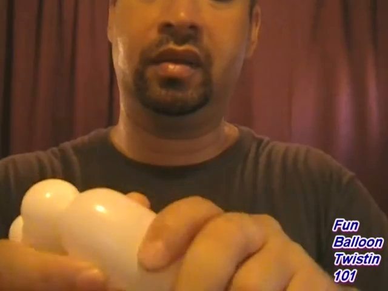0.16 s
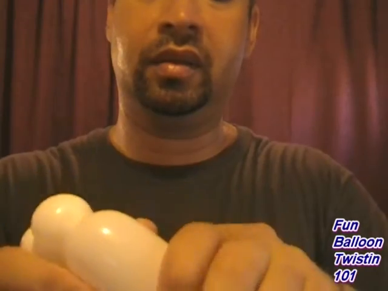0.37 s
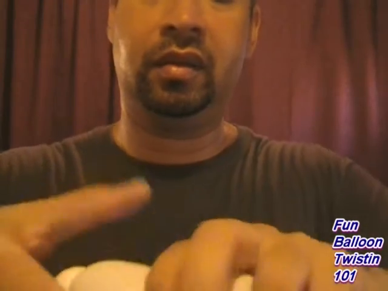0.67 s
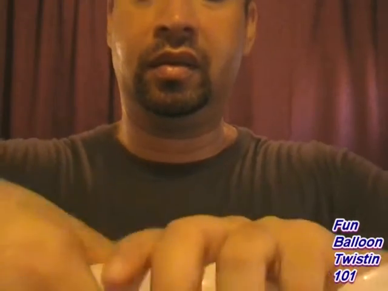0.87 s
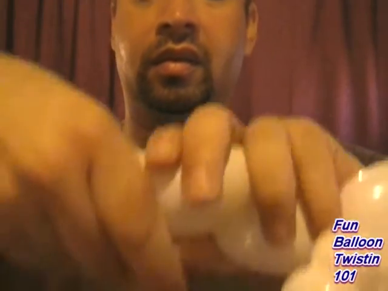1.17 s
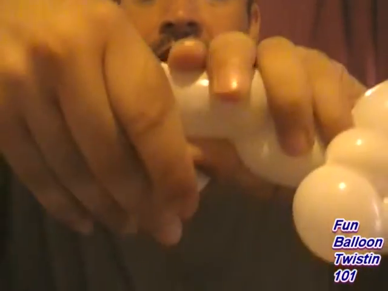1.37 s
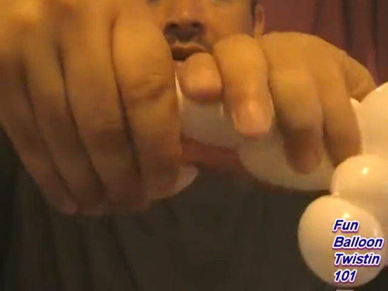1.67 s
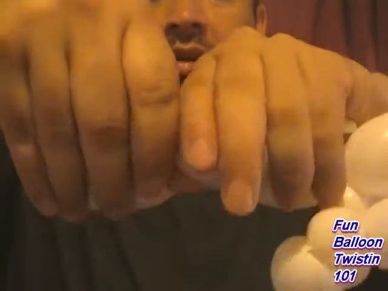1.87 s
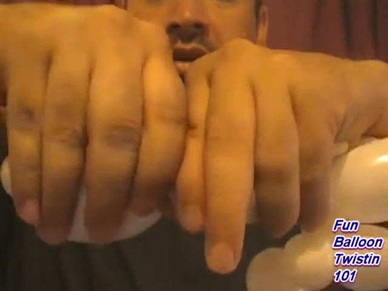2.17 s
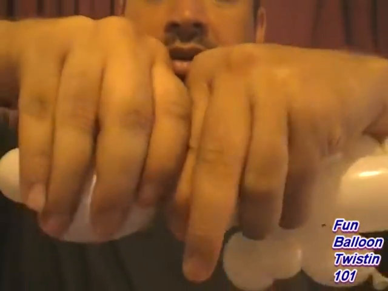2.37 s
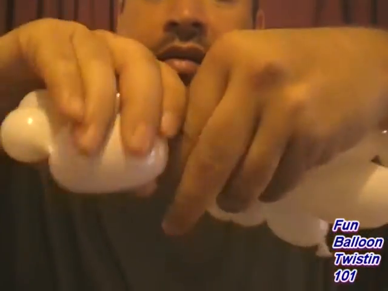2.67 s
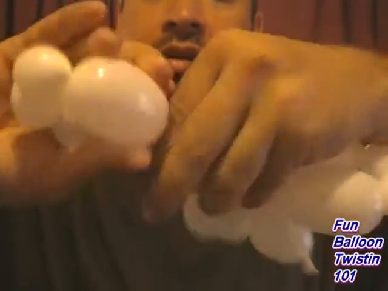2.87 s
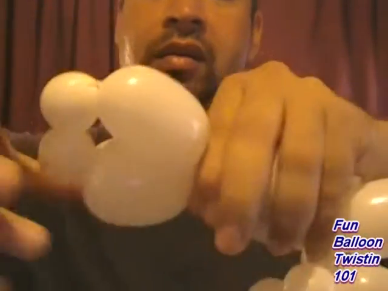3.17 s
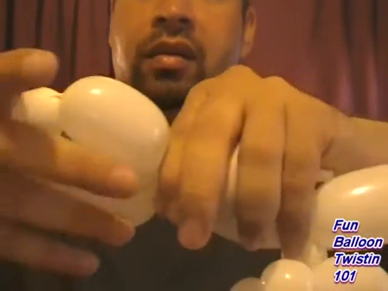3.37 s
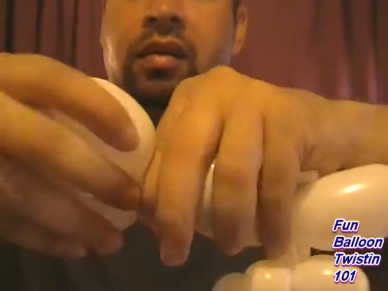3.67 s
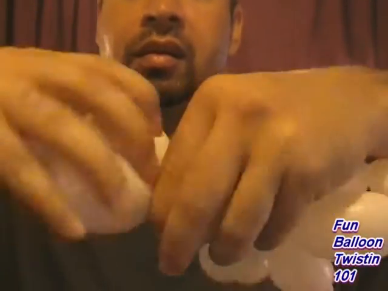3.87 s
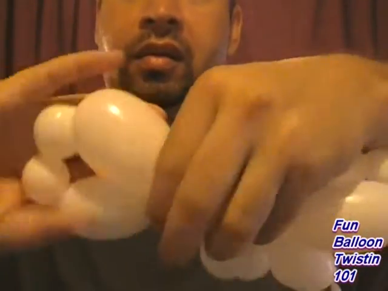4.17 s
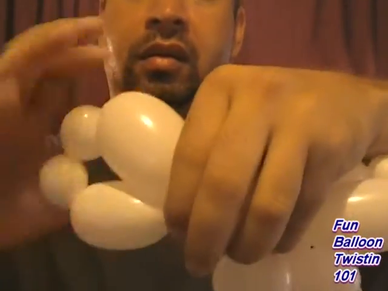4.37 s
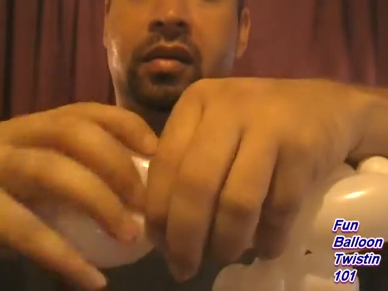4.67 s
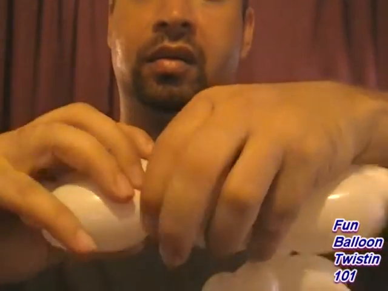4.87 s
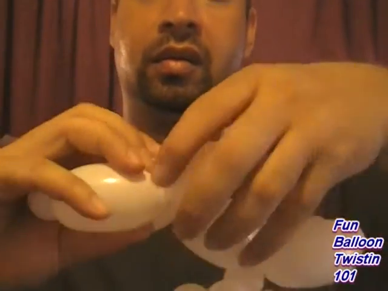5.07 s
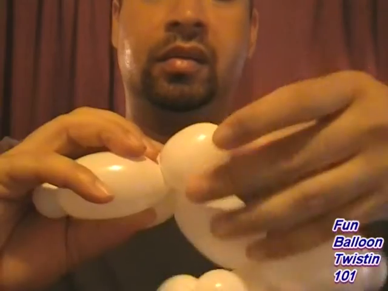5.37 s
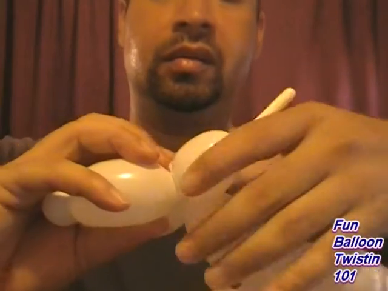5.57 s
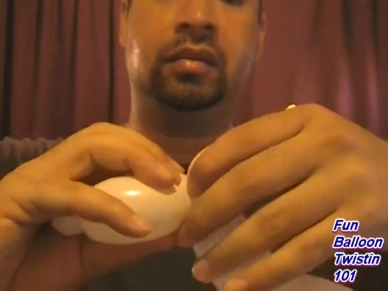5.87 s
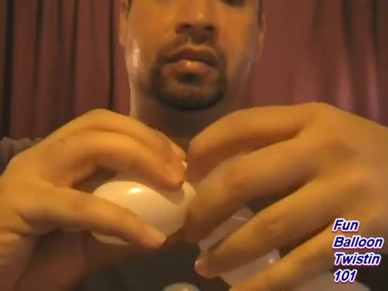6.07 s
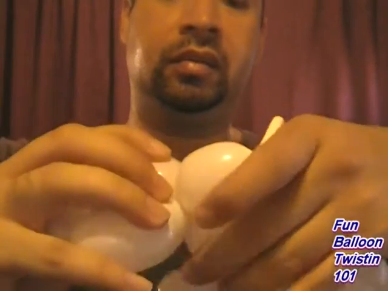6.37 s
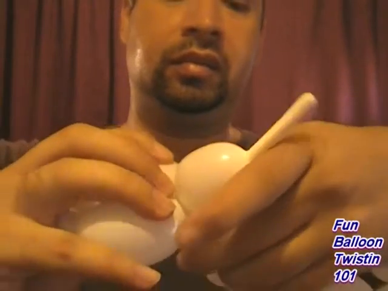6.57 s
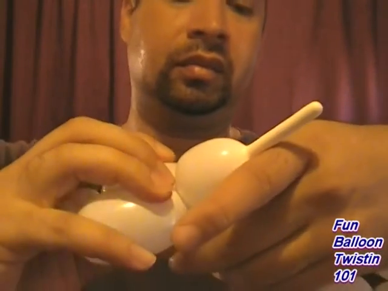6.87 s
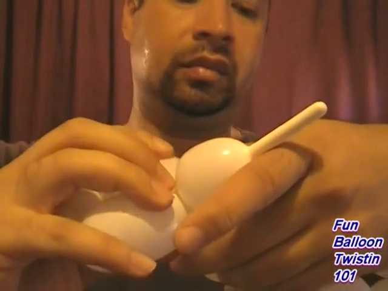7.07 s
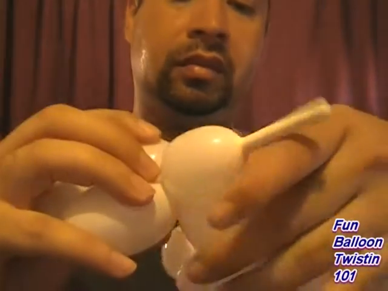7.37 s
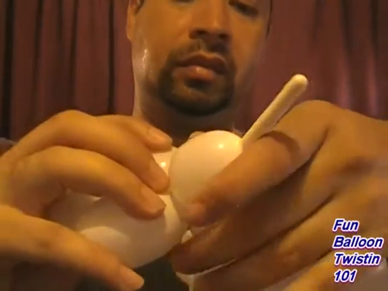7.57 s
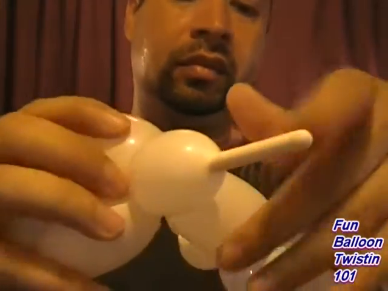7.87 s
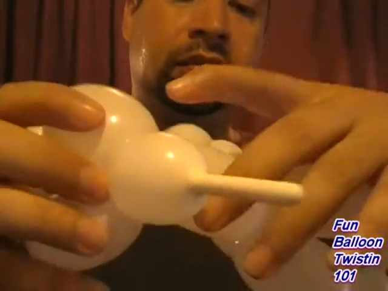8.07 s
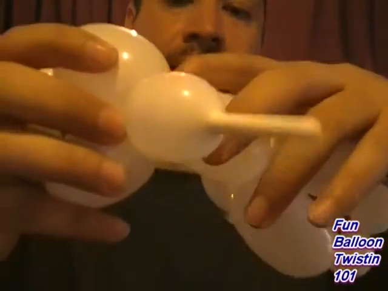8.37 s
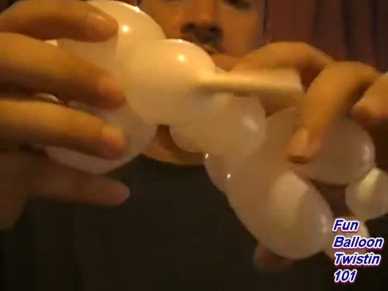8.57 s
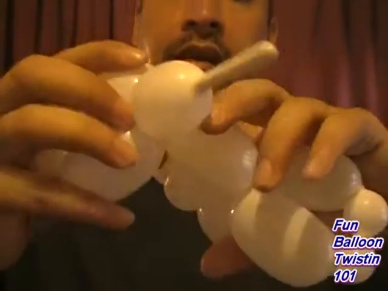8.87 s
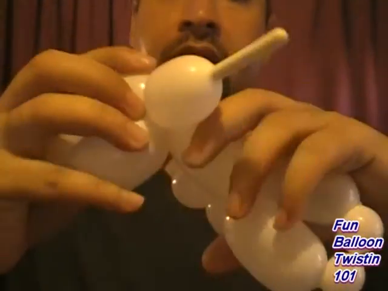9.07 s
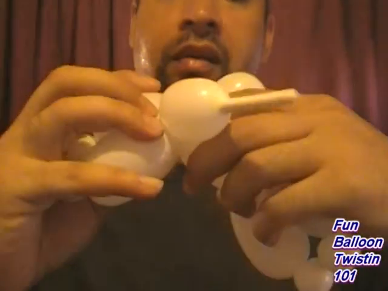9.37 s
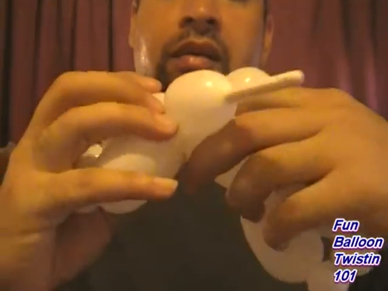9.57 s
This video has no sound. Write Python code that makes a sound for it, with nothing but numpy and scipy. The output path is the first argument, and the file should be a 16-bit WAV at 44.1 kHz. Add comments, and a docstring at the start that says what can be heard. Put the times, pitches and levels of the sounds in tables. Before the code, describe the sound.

Hands twist and squeeze a taut latex balloon up close, with rubbery creaks, pops and dense squeaky crackle over faint room hum and a cricket.

```python
"""Two hands twist and squeeze a latex balloon figure up close in a small curtained room.
A cricket chirps faintly over the room's hum throughout. From the start rubber sticks and slips on rubber:
single pops, quick creaks and a dense rubbing crackle, all ringing the taut bubbles. Between 5 and 6 s a few
slips run so fast that they whistle. The rubbing thins out past 7 s, then pops and creaks crowd in again
from 8 s to the end. The loudest pops overload the input."""
import sys
import numpy as np
from scipy import signal
from scipy.fft import rfft, irfft, next_fast_len
from scipy.io import wavfile
from scipy.ndimage import uniform_filter1d

SR = 44100
rng = np.random.default_rng(int(sys.argv[2]) if len(sys.argv) > 2 else 0)


def inscribe(sig):
    """Save sig as 16-bit PCM at rate SR to the path in sys.argv[1].

    A 1-D sig is mono; a 2-D sig holds one channel per row.
    Samples are clipped to [-1, 1] before scaling.
    """
    pcm = np.round(np.clip(np.atleast_2d(sig).T, -1, 1) * 32767)
    wavfile.write(sys.argv[1], SR, pcm.astype(np.int16))


N = 429093
BUBBLES = 14  # bubble sizes in the figure
GIVE = .25  # how far size shifts the skin ring either way, share of its pitch


def amp(db):
    """Decibels to gain."""
    return 10 ** (np.asarray(db) / 20)


def evened(x):
    """Scales to rms 1."""
    return x / np.sqrt(np.mean(x ** 2) + 1e-20)


def read(points, hz):
    """Reads a spectrum table on a log-frequency axis."""
    f, value = np.transpose(points)
    return np.interp(np.log(hz + 1), np.log(f + 1), value)


def drift(per_s):
    """Slow chance of rms 1 that changes about per_s times a second."""
    span = max(int(SR / per_s), 2)
    smooth = uniform_filter1d(rng.standard_normal(N), span)
    return evened(uniform_filter1d(smooth, span))


def hum(level_db=-53.5):
    """Room noise, strongest in the lows and unrelated at the two ports."""
    # colour of the noise: (frequency [Hz], relative density [dB per Hz])
    hum_colour = [(30, -9.5), (210, 0.5), (1060, -10.5), (1600, -15.5), (5500, -27.5), (8800, -31),
                  (15500, -46)]
    spectrum = rfft(rng.standard_normal((2, N)))
    spectrum *= amp(read(hum_colour, np.fft.rfftfreq(N, 1 / SR)))
    return amp(level_db) * evened(irfft(spectrum, N))


def cricket(db=-51, low_hz=6650, high_hz=7450, chirps_per_s=8.95):
    """A narrow noisy rasp in two wing strokes a chirp, with a fainter far echo between chirps."""
    since = (np.arange(N) / SR * chirps_per_s - .22) % 1 / chirps_per_s  # s into the chirp
    wing_strokes = sum(gain * np.exp(-((since - s) / 0.015) ** 2)
                       for s, gain in ((.012, 0.89), (.034, 0.75)))
    echo = amp(-10.5) * np.exp(-np.maximum(since - .045, 0) / 0.049)
    band = signal.butter(3, [low_hz, high_hz], "band", fs=SR, output="sos")
    rasp = signal.sosfilt(band, rng.standard_normal((2, N)))
    rasp = evened(rasp + 0.45 * rasp[::-1] * [[1], [.6]])  # the ports share part of the rasp
    return amp(db + 1.5 * drift(3)) * (wing_strokes + echo) * rasp


def room(x):
    """Sparse reflections of random sign, each band dying at its own speed, partly alike at the two ports."""
    # decay time: (frequency [Hz], time to fall 60 dB [s])
    decay = [(250, 0.055), (1500, 0.047), (14000, 0.057)]
    # reflections shared by both ports: (frequency [Hz], share [0-1])
    shared = [(100, 0.15), (400, 0.99), (1500, 0.55), (4000, 0.95), (9000, 0.024)]
    # colour of the reflections: (frequency [Hz], level [dB])
    reflection_colour = [(300, -2), (2000, -6.5), (9000, -10)]
    size = SR // 2
    # one reflection somewhere in every 20 samples
    at = np.arange(80, size - 20, 20) + rng.integers(0, 20, (2, (size - 81) // 20))
    taps = np.zeros((2, size))
    np.put_along_axis(taps, at, rng.choice([-1., 1.], at.shape), 1)
    hz, t, z = signal.stft(taps, SR, nperseg=128)
    alike = np.clip(read(shared, hz), 0, 1)[:, None]
    z[1] = alike * z[0] + np.sqrt(1 - alike ** 2) * z[1]
    t60 = np.maximum(read(decay, hz), .02)[:, None]
    tail = signal.istft(z * amp(-60 * t / t60), SR, nperseg=128)[1]
    length = tail.shape[1]
    colour = amp(read(reflection_colour, np.fft.rfftfreq(length, 1 / SR))) / np.linalg.norm(tail[0])
    return signal.oaconvolve(x[None], irfft(rfft(tail) * colour, length), axes=1)[:, :N]


def ports(x):
    """Two close microphone ports: a small lean in level and a phase lead that change with pitch."""
    # left port ahead of the right: (frequency [Hz], phase [rad])
    lead = [(0, 0), (260, 0.6), (690, 0.1), (2070, -0.1), (8010, 0.4), (8790, 1.4), (10800, 0.3),
            (15400, -0.1)]
    # left minus right: (frequency [Hz], level [dB])
    lean = [(60, -22), (180, 1.5), (550, 2.5), (1650, 2), (4970, -1.5), (15000, 3.5)]
    size = next_fast_len(N)
    hz = np.fft.rfftfreq(size, 1 / SR)
    half = amp(read(lean, hz) / 2) * np.exp(.5j * read(lead, hz))  # each port takes half the difference
    return irfft(rfft(x, size) * np.array([half, 1 / half]), size)[:, :N]


def squeaks():
    """Slips so fast that they whistle: a wavering tone with its second and third harmonic."""
    # whistles: (start [s], end [s], first pitch [Hz], last pitch [Hz], fundamental level [dB],
    # rms pitch waver [share])
    whistles = [(5.191, 5.248, 1880, 1980, -31, .11), (5.732, 5.752, 1700, 2050, -30, .05),
                (5.771, 5.792, 2200, 2050, -40, .02), (5.844, 5.866, 2950, 2900, -28, .03),
                (5.893, 5.962, 2950, 2900, -33, .03)]
    out, waver = np.zeros(N), drift(1200)
    for start, end, first_hz, last_hz, db, unsteady in whistles:
        part = slice(int(start * SR), int(end * SR))
        n = part.stop - part.start
        pitch_hz = np.linspace(first_hz, last_hz, n) * (1 + unsteady * waver[part])
        phase = 2 * np.pi * np.cumsum(pitch_hz) / SR
        tone = np.sin(phase) + amp(-9) * np.sin(2 * phase) + amp(-18) * np.sin(3 * phase)
        level = amp(db + 30 * unsteady * waver[::-1][part])  # level wavers apart from pitch
        out[part] += level * tone * signal.windows.tukey(n, .15)
    return out


def handled(s, chance, rest_hz=1600):
    """The bubble whose size fits the tightness at time s, give or take a neighbour."""
    # tightness of the handled bubble: (time [s], centre of its skin ring [Hz])
    tightness = [(0, 1653), (.7, 1347), (.9, 1599), (1.1, 1246), (1.75, 1453), (2.4, 1939), (2.85, 1537),
                 (3.9, 1841), (4.02, 1395), (4.15, 1705), (4.25, 1145), (6.05, 1857), (7.5, 1401),
                 (9.7, 1659)]
    place = (np.interp(s, *np.transpose(tightness)) / rest_hz - 1) / (2 * GIVE) + .5  # rest_hz: middle bubble
    return np.clip(np.round(place * (BUBBLES - 1) + 1.5 * chance), 0, BUBBLES - 1)


def rubbed():
    """Which bubble each grain rings: near the handled one, the fingers shifting every 1200 samples."""
    held = np.repeat(rng.standard_normal(N // 1200 + 1), 1200)[:N]
    return handled(np.arange(N) / SR, held + rng.standard_normal(N))


def rubbing():
    """Times, then ring, hollow and bright levels in dB: each stroke sets in, leans louder or softer, and dies."""
    # strokes of skin or rubber over rubber: (grip [s], let-go [s], first level [dB], last level [dB],
    # hollow part against the ring [dB], bright part against the ring [dB])
    rub_strokes = [(0, 0.265, -33.5, -37, -6.5, -3), (0.283, 0.451, -44.5, -26.5, -2.5, -2),
                   (0.507, 0.741, -36.5, -39, -5.5, -0.5), (0.798, 0.926, -39, -29.5, -9, -3),
                   (0.971, 1.052, -35.5, -31, -4.5, -2), (1.156, 1.363, -27, -31.5, -7.5, -2.5),
                   (1.411, 1.635, -34, -38.5, -7, -0.5), (1.669, 2.126, -34, -29.5, -8, -0.5),
                   (2.126, 2.79, -29, -37.5, -13, 0.5), (2.764, 2.886, -36.5, -23.5, -12, 1.5),
                   (3.016, 3.267, -49, -56.5, -4, -3), (3.394, 3.548, -43.5, -41.5, -6.5, 1),
                   (3.562, 3.707, -39.5, -32.5, -5, -3), (3.746, 4.078, -36, -23, -9.5, -1.5),
                   (4.097, 4.222, -28, -34, -12.5, -1.5), (4.252, 4.309, -38.5, -38, -1.5, 2),
                   (4.563, 4.732, -34.5, -34, -7.5, 2), (4.746, 5.018, -31.5, -33.5, -8, -1),
                   (5.109, 5.151, -34.5, -45, -8.5, -5.5), (5.204, 5.235, -33, -43.5, -14, 2.5),
                   (5.27, 5.422, -36.5, -38.5, -8.5, -0.5), (5.481, 5.714, -48, -46.5, -9, -1.5),
                   (5.73, 5.74, -28, -35.5, -9, -1), (5.821, 5.925, -27, -40, -13, -0.5),
                   (5.93, 6.091, -38.5, -34, -8.5, -1.5), (6.11, 6.315, -43.5, -53.5, -7, -3),
                   (6.347, 6.57, -51, -37, -6, -2), (6.641, 6.722, -35, -52, -3.5, -5),
                   (6.716, 6.91, -46, -41, -6.5, -8), (6.96, 7.047, -39, -30, -6.5, -2.5),
                   (7.067, 7.177, -52, -35, -3.5, -3), (7.248, 7.337, -45, -49.5, -3, -2.5),
                   (7.438, 7.712, -46.5, -45.5, -2, -3), (8.01, 8.18, -43.5, -47.5, -6, -5),
                   (8.234, 8.438, -30.5, -41.5, -6, -4.5), (8.477, 8.534, -30, -42, -11, -2.5),
                   (8.584, 8.7, -53, -35, -2.5, 0.5), (8.713, 8.876, -25, -41, -4, -3.5),
                   (8.908, 9.23, -28, -40, -5.5, -2.5), (9.24, 9.407, -30.5, -38, -11.5, 0),
                   (9.449, 9.497, -47, -40, -3, -5.5), (9.542, 9.649, -19.5, -42, -9.5, -4),
                   (9.652, 9.73, -41, -44.5, -5, 0.5)]
    grip_db_per_s, let_go_db_per_s = 590, 338.5  # how fast a stroke sets in and dies
    jerk_db, jerky_s = 2, 0.46  # strokes up to jerky_s long move in full jerks; longer ones glide more evenly
    t, power = np.arange(0, N / SR + .01, .002), 1e-9
    jerks = np.interp(t * SR, np.arange(N), drift(31))
    for grip, let_go, first_db, last_db, hollow_db, bright_db in rub_strokes:
        db = np.interp(t, [grip, max(let_go, grip + .01)], [first_db, last_db])
        db -= grip_db_per_s * np.maximum(grip - t, 0)
        db -= let_go_db_per_s * np.maximum(t - let_go, 0)
        db += jerk_db * min(jerky_s / max(let_go - grip, .01), 1) * jerks
        power = power + amp(db + np.array([[0], [hollow_db], [bright_db]])) ** 2
    return np.vstack([t, 10 * np.log10(power)])


def crackle(dense_per_s=3000, sparse_per_s=300, sparse_db=-1.0, size_db=3.5):
    """Random slips of rms 1: a fine fizz and fewer large ones, arriving in brief clumps."""
    fizz = rng.standard_normal(N) * (rng.random(N) < dense_per_s / SR)
    sizes = amp(size_db * np.minimum(rng.exponential(1, N), 3))
    large = sizes * (rng.random(N) < sparse_per_s / SR)
    clumps = amp(1.6 * drift(80))
    return evened(clumps * (evened(fizz) + amp(sparse_db) * evened(large)))


def slips():
    """Every pop and every slip of a creak as columns (s, ring dB, snap dB, hollow against ring dB, bubble)."""
    # single slips: (time [s], skin ring peak [dB], bright snap peak [dB], hollow part against the ring [dB])
    pops = [(0.017, -15, 1.5, -19), (0.307, -16, -18.5, -7), (0.433, -6, -7, -9.5),
            (0.6071, -16, -16, -6.5), (.809, -14, -12, -8), (.845, -13, -9.5, -5.5), (.858, -29, -24, -8),
            (1.092, -18, -10, -8), (1.1352, -19, -9, -8), (1.1514, -14, -24, -15), (1.2798, -27, -8, -14),
            (1.304, -28, -8.5, -15), (1.6876, -10.5, 6, -23), (2.876, -4.5, 2.5, -11),
            (2.8825, -9, -9, -8.5), (3.195, -39, -30, -5), (3.2122, -28.5, -21.5, -2),
            (3.237, -38, -16.5, -7), (3.3625, -27.5, -11.5, -17), (3.529, -21, -24, -13),
            (3.568, -14, -7.5, -14), (3.7733, -25, -6.5, -23), (3.787, -12, -9, -18),
            (3.8406, -12, -7, -22), (4.066, -14, -11, -9), (4.1393, -29, -5.5, -11),
            (4.2867, -18, -6.5, -14), (4.295, -15, -6, -13), (4.2992, -12, -7, -13),
            (4.303, -15.5, -6, -3.5), (4.561, -13, -3, -10.5), (4.6216, -17, -3.5, -3.5),
            (4.651, -14, -6, -21), (4.963, -19.5, -11.5, -14), (5.285, -16.5, -14, -7.5),
            (5.6761, -9, -9, -10), (5.718, -14.5, -16, -14), (5.814, -1, 12.5, -22.5),
            (5.8294, -11, -3.5, -34.5), (5.995, -9, -17, -8.5), (6.011, -6, -3.5, -12),
            (6.056, -15, 2, -28), (6.074, -5, -0.5, -26), (6.094, -10, -11, -23), (6.34, -25, -32, -4),
            (6.5112, -20.5, -14.5, -10), (6.538, -17.5, -10, -1.5), (6.554, -17.5, -19, -4.5),
            (6.6037, -16.5, -20, -4.5), (6.6328, -18, -15, -5), (6.648, -18, -19, -7),
            (6.7751, -21, -16.5, -5), (6.8498, -21.5, -15, -1), (6.875, -18.5, -17, -8),
            (6.897, -24, -26, -4), (6.9228, -15, -16, -19), (7.328, -30, -15, -22), (7.501, -30, -20.5, -5),
            (7.562, -23.5, -21.5, -6), (7.572, -24, -29, -3.5), (7.655, -37, -29, -3),
            (7.676, -31, -32, -4), (7.713, -20, -15, -16), (7.759, -31.5, -37, -2),
            (7.905, -34, -32.5, 0.5), (7.983, -38, -33, -1), (8.011, -21, -18, -15),
            (8.0353, -19.5, -21, -14), (8.0697, -19, -21.5, -16), (8.1008, -19, -18, -12),
            (8.1332, -13.5, -16, -13.5), (8.236, -9.5, -12, -8.5), (8.2812, -11.5, -13, -19),
            (8.2923, -11.5, -20, -18), (8.3302, -12.5, -7, -23), (8.379, -9.5, -12, -22.5),
            (8.426, -12.5, -7, -24), (8.4666, -10.5, -7, -21), (8.5039, -19.5, -9, -13),
            (8.648, -18, -17.5, -8.5), (8.6818, -14, -16, -8), (8.8875, -16, -16, -19),
            (9.041, -13, -9.5, -6), (9.056, -35, -22, -12), (9.077, 1, 6.5, -17), (9.114, -16.5, -13.5, -3),
            (9.1502, -15.5, -15, -9), (9.233, -11, -21, -7.5), (9.2557, -15, -18, -2),
            (9.2639, 0.5, 9.5, -18), (9.3065, -9, -30, -10), (9.3128, -10, -9, -8),
            (9.3967, -16.5, -19, -3.5), (9.4094, -12, -3.5, -20), (9.5084, -8, -11, -17),
            (9.524, -3, -3, -23)]
    # runs of even slips: (start [s], end [s], first rate [Hz], last rate [Hz], ring peak before swell [dB],
    # snap peak before swell [dB], hollow part against the ring [dB])
    creaks = [(0.337, 0.385, 71, 89.7, -18.5, -25, -19), (0.668, 0.739, 55, 55.5, -13.5, -12, -4.5),
              (4.589, 4.613, 71.1, 132.3, -14.5, -4.5, -13), (8.815, 8.861, 47.5, 53.5, -16, -12, -9),
              (9.5505, 9.61, 52.6, 45.9, -21.5, -5.5, -2.5), (1.103, 1.13, 71.2, 73, -17, -8, -13.5),
              (7.2846, 7.299, 72.4, 72, -22.5, -20, -8), (5.79, 5.809, 161.6, 186, -36, -14, -22),
              (0.432, 0.46, 235, 458, -9.5, -8.5, -23.5), (3.41, 3.437, 311, 336, -24.5, -20.5, -9),
              (3.652, 3.685, 353, 301, -12, -8.5, -44), (3.88, 3.915, 342, 357, -16.5, -15.5, -27),
              (3.994, 4.026, 305.6, 338, -16, -10, -10), (4.09, 4.108, 228.8, 249, -8.5, -8.5, -32),
              (4.797, 4.819, 232, 414, -12, -16.5, -14), (6.921, 6.971, 211.2, 332, -17.5, -16, -6),
              (6.96, 6.998, 338, 339, -28, -21, 1), (7.002, 7.037, 159.8, 187.6, -18.5, -13.5, -14),
              (7.158, 7.175, 295, 374, -16.5, -19, -5.5), (7.413, 7.518, 107.5, 104.7, -33.5, -49, -3),
              (7.632, 7.651, 109.2, 110, -22.5, -44, -18), (9.709, 9.747, 280, 394, -20.5, -22.5, -14.5)]
    rows = [(*pop, handled(pop[0], rng.standard_normal())) for pop in pops]
    for start, end, first_hz, last_hz, ring_db, snap_db, hollow_db in creaks:
        bubble = handled(start, rng.standard_normal())
        s = start
        # chance lateness [share of a period], ring and snap [dB]; slower creaks are steadier
        wobble = rng.standard_normal((64, 3)) * min(first_hz / 300, 1) * [.025, 1.5, 2.5]
        for late, full_db, sharp_db in wobble:
            u = (s - start) / (end - start)
            if u > 1:
                break
            swell_db = -5. * min(first_hz / 200, 1) * (2 * u - 1) ** 2  # the grip tightens, then lets go
            rows.append((s, ring_db + swell_db + full_db, snap_db + swell_db + sharp_db, hollow_db, bubble))
            s += (1 + late) / (first_hz + u * (last_hz - first_hz))
    return np.array(rows).T


def ring(modes, stretch, tear_s):
    """One bubble's answer to a slip, peak 1: decaying modes shifted by its size and weighted by its shape."""
    t = np.arange(768) / SR
    weight_db, shift = rng.standard_normal((2, len(modes))) * [[1.5], [.05]]
    wave = np.zeros(len(t))
    for k, (hz, width, db) in enumerate(modes):
        swing = (-1) ** k * np.sin(2 * np.pi * hz * stretch * (1 + shift[k]) * t)  # neighbours swing opposite ways
        wave += amp(db + weight_db[k]) * np.exp(-np.pi * width * t) * swing
    wave *= 1 - np.exp(-t * modes[0][0] * 2.5)  # the rubber lets go within part of a cycle
    tear = rng.standard_normal(256) * np.exp(-t[:256] / tear_s)  # the contact peels away in a ragged instant
    tear[0] = 4
    wave = np.convolve(wave, tear)[:len(t)]
    return wave / abs(wave).max()


def balloon():
    """Slips and the crackle of rubbing strike the modes of bubbles of different size."""
    # what a middle bubble rings with, hollow, skin and bright:
    # (nominal frequency [Hz], width [Hz], relative level [dB])
    drum, skin, snap = [(196, 212, -10), (434.5, 312, 3.5), (577, 269, 1), (877, 234, 4)], [(1077, 330, -4.5), (1392, 330, 0.5), (1903, 436, 3), (2778, 318, -1)], [(3840, 1466, 1.5), (5820, 930, -2.5), (7480, 1750, 5),
                                                    (10820, 3590, 1.5), (12500, 2000, -6)]
    s, ring_db, snap_db, hollow_db, bubble = slips()
    at = np.minimum((s * SR).astype(int), N - 1)
    t = np.arange(N) / SR
    rub_t, rub_ring_db, rub_hollow_db, rub_bright_db = rubbing()
    grains, where = crackle(), rubbed()
    stretches, out = np.linspace(-GIVE, GIVE, BUBBLES), np.zeros(N)
    # modes, slip dB, rub dB, tear s, share of the size shift; the longer tear keeps the treble ragged
    parts = ((skin, ring_db, rub_ring_db, .0001, 1),
             (drum, ring_db + hollow_db, rub_hollow_db, .0001, .5),
             (snap, snap_db, rub_bright_db, .0007, .5))
    for modes, slip_db, rub_db, tear_s, follow in parts:
        level = amp(np.interp(t, rub_t, rub_db))
        for k in range(BUBBLES):
            wave = ring(modes, 1 + follow * stretches[k], tear_s)
            drive = grains * level * (where == k) / np.linalg.norm(wave)
            drive += np.bincount(at, amp(slip_db) * (bubble == k), N)
            out += signal.oaconvolve(drive, wave)[:N]
    return out


def scene():
    """The close balloon, its lows thinned below 160 Hz; its reflections, the cricket and the hum."""
    bass_cut = signal.butter(2, 160, "high", fs=SR, output="sos")
    near = signal.sosfilt(bass_cut, balloon() + squeaks())
    turn = np.arange(N) / SR * 4  # rad; the moving hands keep changing the paths of the reflections
    reflections = sum(room(near * np.sqrt(2 / 3) * np.cos(turn + k * np.pi / 3)) for k in range(3))
    return ports(near) + reflections + cricket() + hum()


def record(dry, edge_hz=15800):
    """The input clips at full scale, lopsidedly, so each overload leaves a low thump; then the band limit."""
    over = np.clip(abs(dry) - 1, 0, 1)
    thump = amp(-11) * uniform_filter1d(over, size=40)
    clipped = np.clip(dry + thump, -1, 1)
    band_limit = signal.firwin(511, edge_hz, window=("kaiser", 9), fs=SR)
    return signal.oaconvolve(clipped, band_limit[None], "same")


dry = scene()
out = record(dry)
inscribe(out)
```